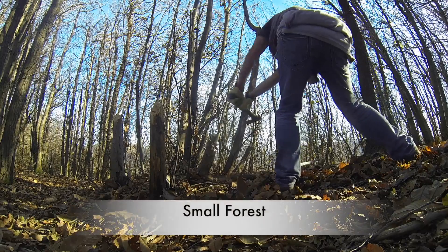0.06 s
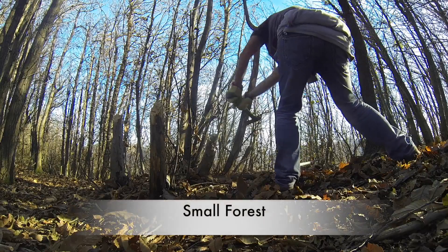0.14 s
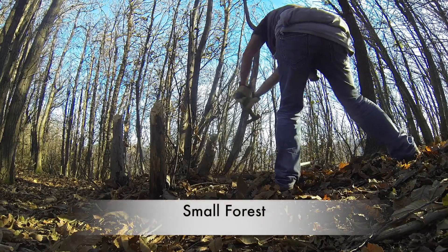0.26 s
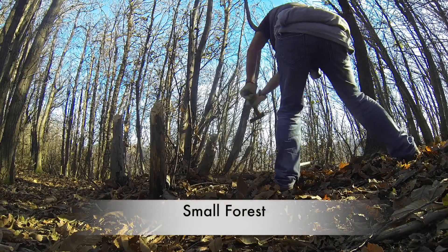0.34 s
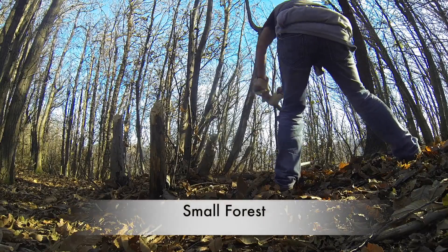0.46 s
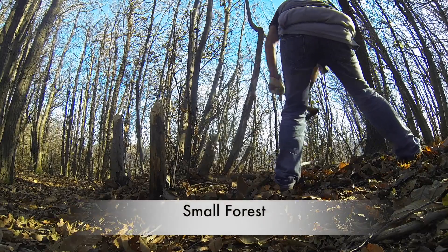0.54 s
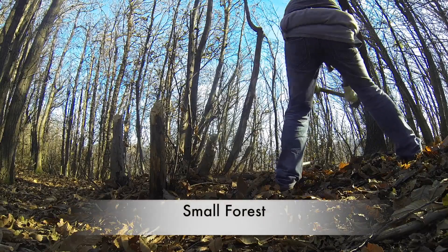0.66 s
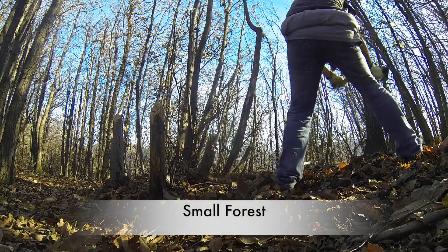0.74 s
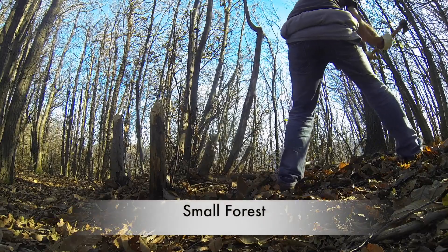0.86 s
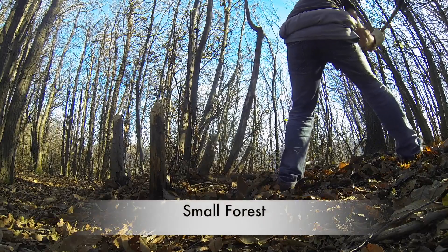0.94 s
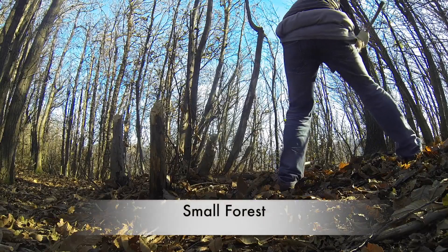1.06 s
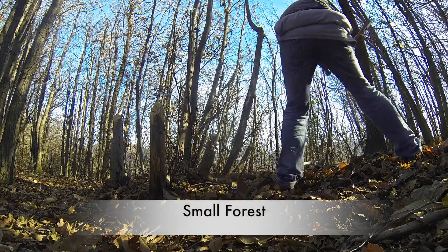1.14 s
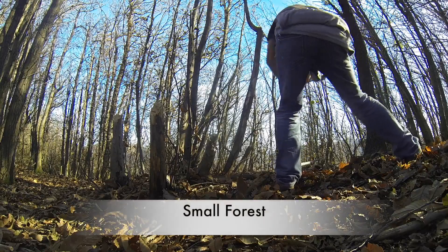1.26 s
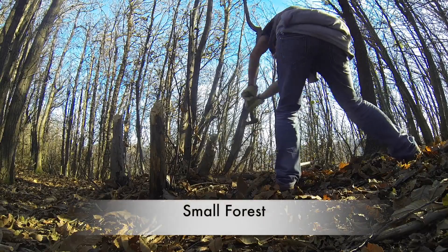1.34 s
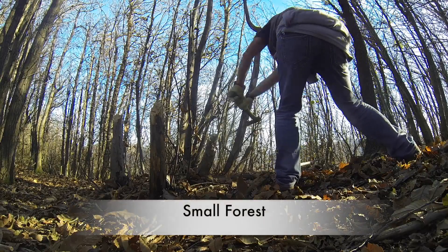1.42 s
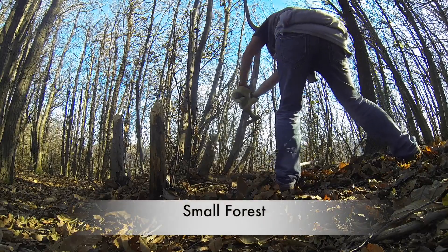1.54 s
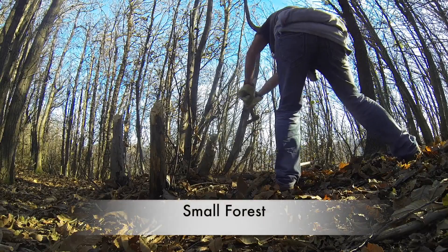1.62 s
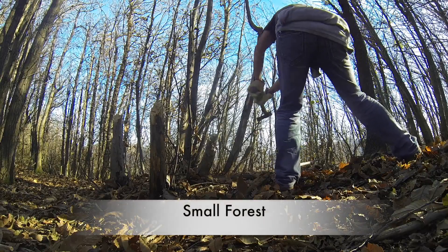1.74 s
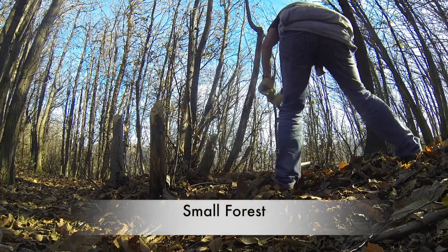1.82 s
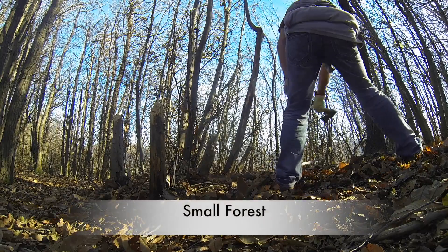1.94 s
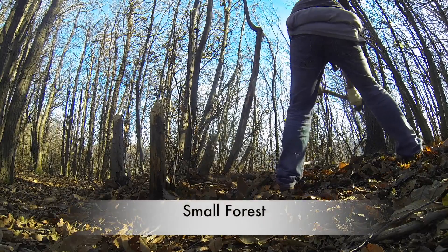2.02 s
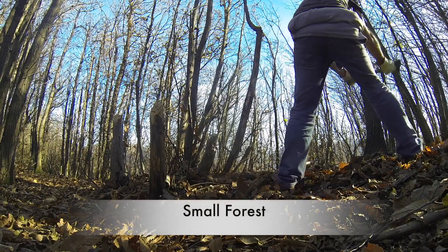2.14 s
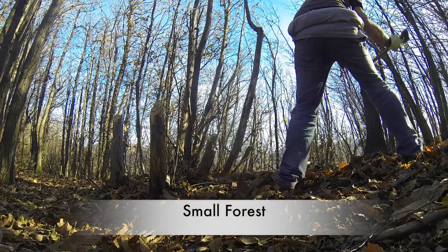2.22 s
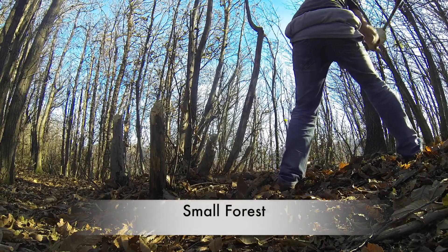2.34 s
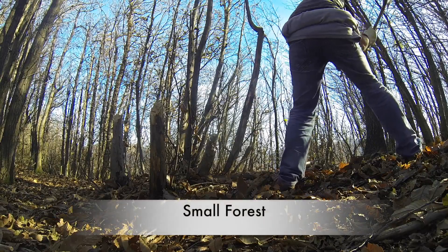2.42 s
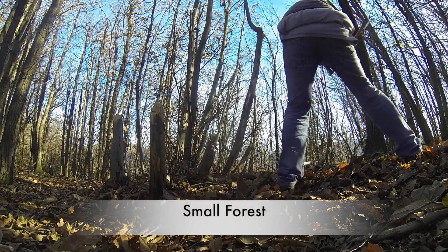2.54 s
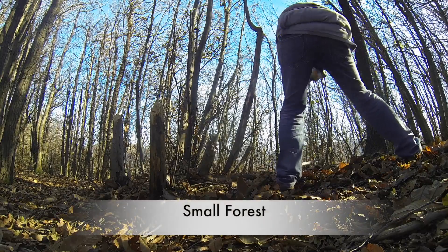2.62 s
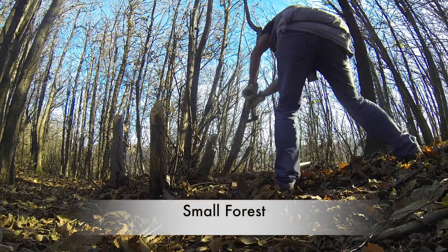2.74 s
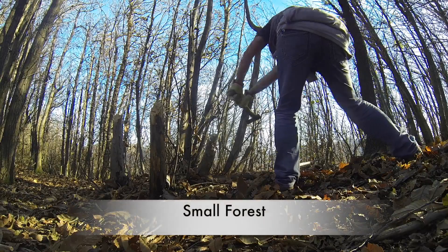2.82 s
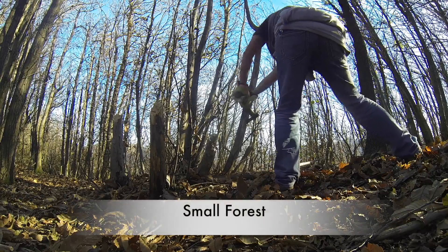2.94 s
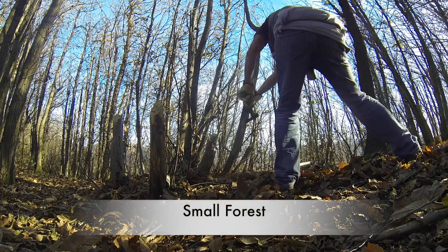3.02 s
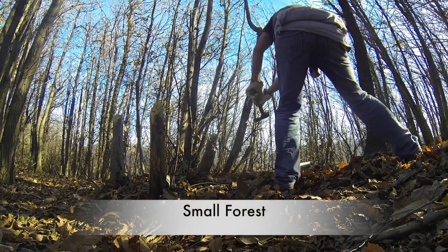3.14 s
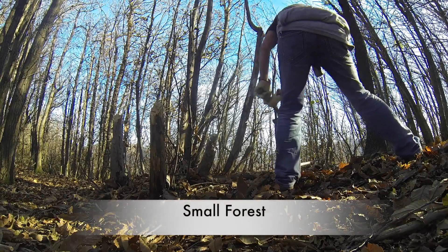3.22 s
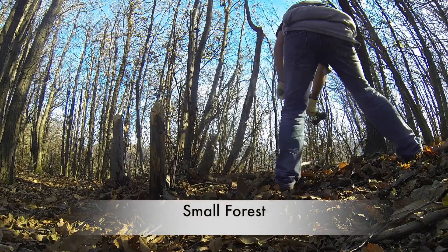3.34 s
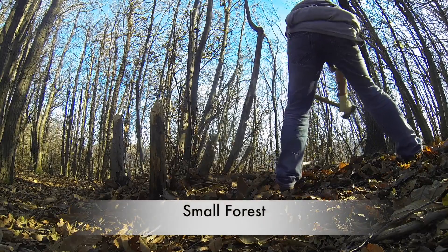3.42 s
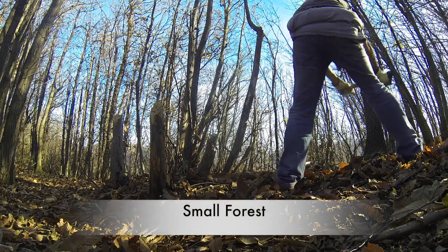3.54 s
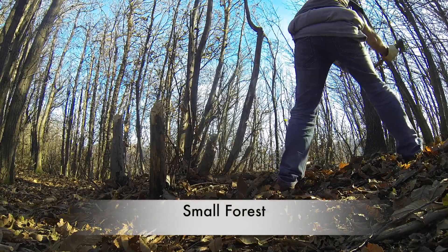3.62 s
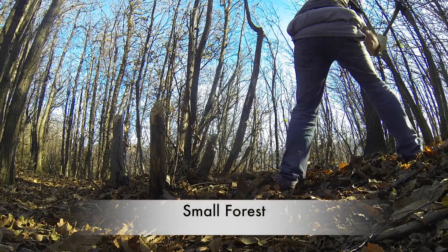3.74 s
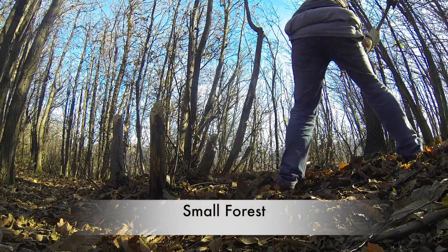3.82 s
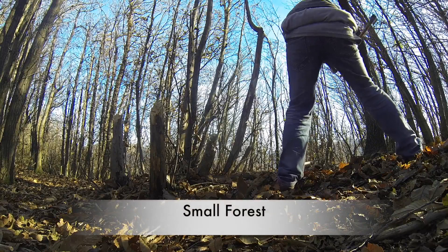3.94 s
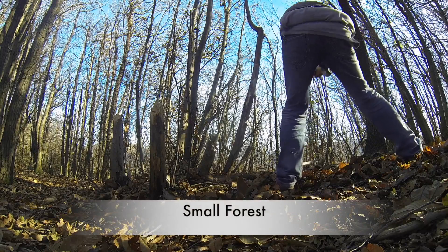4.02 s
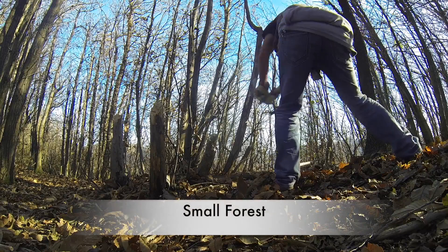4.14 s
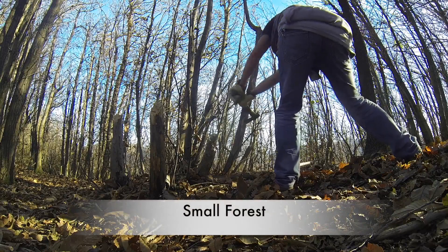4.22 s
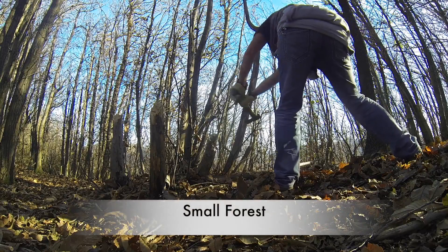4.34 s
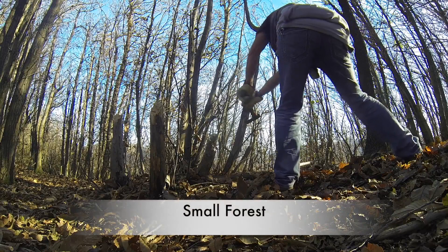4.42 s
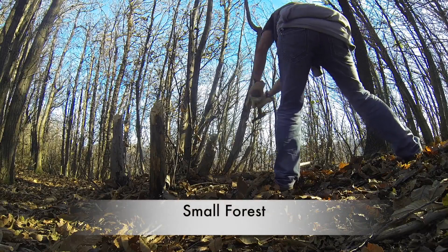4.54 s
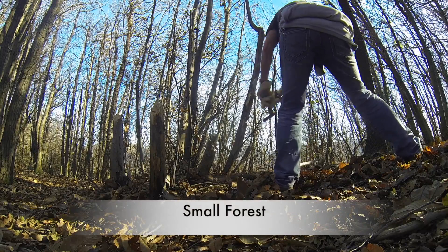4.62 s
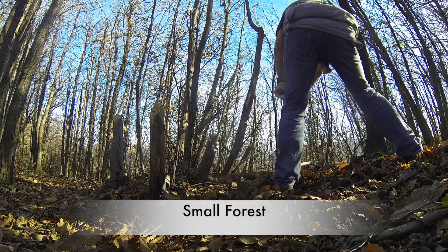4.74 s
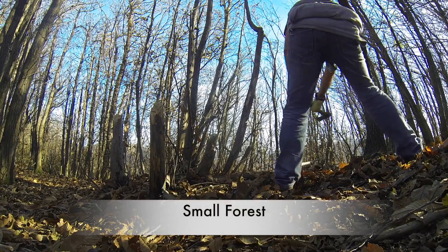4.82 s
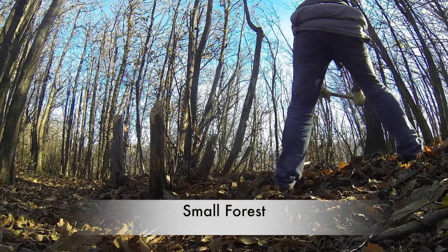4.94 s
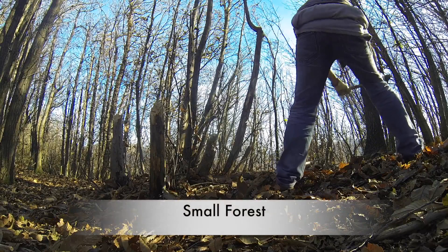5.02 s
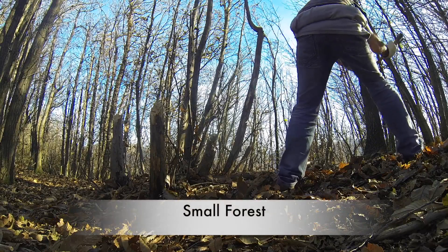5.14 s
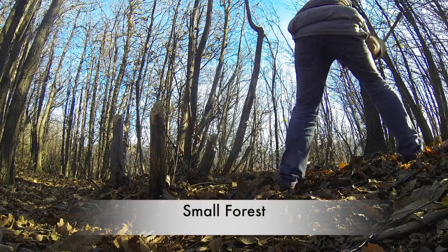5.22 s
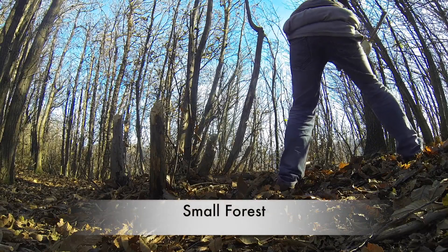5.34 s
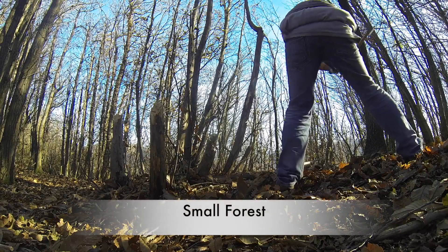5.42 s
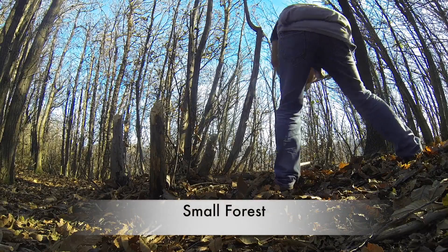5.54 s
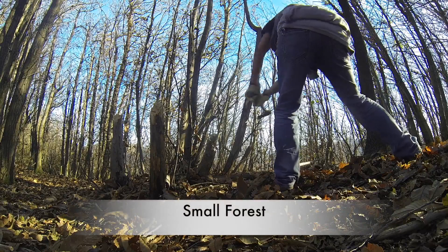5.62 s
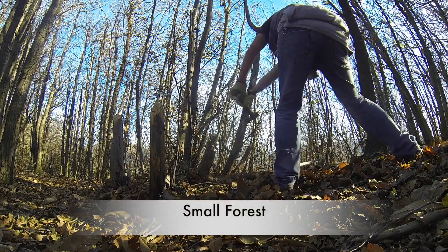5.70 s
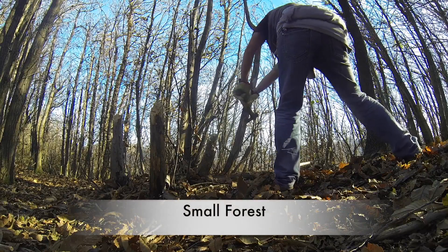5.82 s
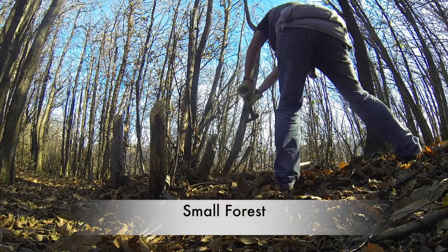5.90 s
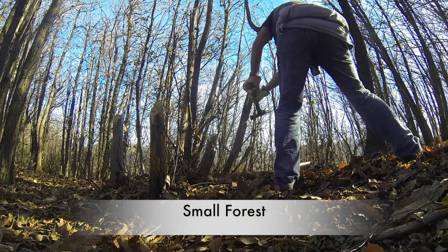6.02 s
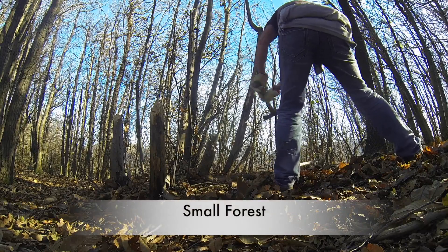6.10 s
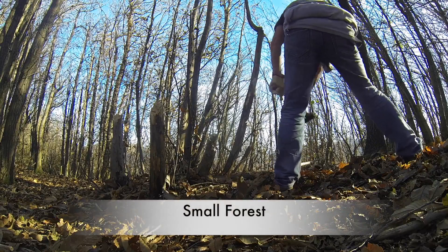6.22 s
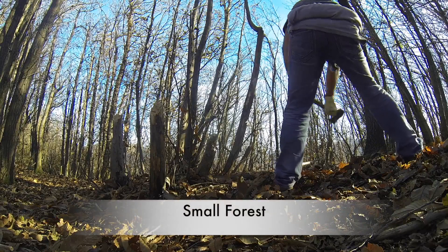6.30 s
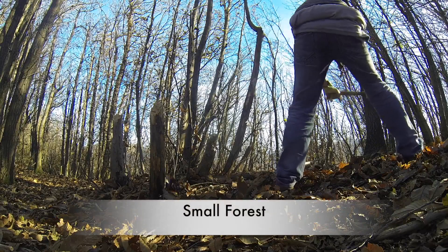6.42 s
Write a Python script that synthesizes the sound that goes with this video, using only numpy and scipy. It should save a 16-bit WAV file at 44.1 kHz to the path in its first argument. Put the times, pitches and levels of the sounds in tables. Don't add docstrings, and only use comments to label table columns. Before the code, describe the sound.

Five evenly spaced, close axe chops crack and thud in still woodland, with chips pattering into dry leaves and a faint distant bird.

```python
import sys
import numpy as np
from scipy import signal
from scipy.fft import rfft, irfft, next_fast_len
from scipy.io import wavfile
from scipy.ndimage import uniform_filter1d

SR = 44100
rng = np.random.default_rng(int(sys.argv[2]) if len(sys.argv) > 2 else 0)


def transcribe(u):
    v = np.clip(np.atleast_2d(u).T, -1, 1)
    q = np.round(v * 32767).astype(np.int16)
    wavfile.write(sys.argv[1], SR, q)


def voltage_ratio(level):
    return 10 ** (np.asarray(level, float) / 20)


N = 285327


def unit(x):
    return x / np.sqrt(np.mean(x ** 2) + 1e-20)


def peaked(x):
    return x / np.abs(x).max()


def wandering(count, size):
    return unit(uniform_filter1d(rng.standard_normal(count), size=size))


def along(points, hz):
    f, v = np.transpose(points)
    return np.interp(np.log(hz + 1), np.log(f + 1), v)


def curves(rows):
    s, *cols = np.transpose(rows)
    return [np.interp(np.arange(N) / SR, s, c) for c in cols]


def filtered(x, response):
    m = next_fast_len(len(x) + 8192)
    spectrum = rfft(x, m) * response(np.fft.rfftfreq(m, 1 / SR))
    return irfft(spectrum, m)[:len(x)]


def coloured(x, spectrum):
    return unit(filtered(x, lambda hz: voltage_ratio(along(spectrum, hz))))


def causal(points, hz):
    ceps = irfft(np.log(voltage_ratio(along(points, hz))))
    half = len(ceps) // 2
    folded = np.r_[ceps[0], 2 * ceps[1:half], np.zeros(len(ceps) - half)]
    return np.exp(rfft(folded))[:len(hz)]


def resonances(peaks, f):
    total = 0
    for k, (centre, width, db) in enumerate(peaks):
        damping = 1j * f * width
        total = total + (-1) ** k * voltage_ratio(db) * damping / (centre * centre - f * f + damping)
    return total


def ring(modes, t, scatter_db):
    total = 0
    for hz, db, t60, way in modes:
        level = db + scatter_db * rng.standard_normal()
        total = total + way * voltage_ratio(level - 60 * t / t60) * np.sin(2 * np.pi * hz * t)
    return total


def gritty(count, depth_db):
    return rng.standard_normal(count) * voltage_ratio(depth_db * wandering(count, 150))


def add(track, s, x):
    part = track[round(s * SR):][:len(x)]
    part += x[:len(part)]


# frequency in Hz, level in dB.
AIR_SPECTRUM = [(15, -29.5), (25, 3), (81, 0.5), (151, -4.5), (214, -3.5), (429, -18.5), (1130, -25),
                (1400, -28), (2390, -30), (3980, -34.5), (7170, -34), (11600, -39), (12900, -46.5),
                (14000, -45), (15200, -47.5)]
# time in seconds, level in dB.
TRAFFIC_LEVEL = [(0.0, -51), (2.88, -52), (3.12, -50), (3.55, -50), (4.27, -52.5), (4.49, -48),
                 (5.03, -51.5), (5.78, -51.5), (5.93, -49), (6.47, -53)]


def background():
    whine_hz, whine_db = 14060, -79.5
    drift = 0.6 * wandering(N, 400)
    whine = voltage_ratio(2.5 * wandering(N, 1500)) * np.sin(2 * np.pi * whine_hz * np.arange(N) / SR + drift)
    traffic_db = curves(TRAFFIC_LEVEL)[0] + 2.0
    return voltage_ratio(traffic_db) * coloured(rng.standard_normal(N), AIR_SPECTRUM) + voltage_ratio(whine_db) * whine


# time in seconds, pitch in Hz, level in dB.
BIRD_NOTES = [
    [(5.16, 732, -75), (5.17, 717, -64), (5.2, 705, -68), (5.276, 690, -68.5), (5.32, 705.3, -75.5)],
    [(5.425, 632, -64), (5.444, 640, -61), (5.528, 638, -57), (5.59, 640, -74)],
]


def bird():
    out = np.zeros(N)
    for note in BIRD_NOTES:
        hz, db = curves(note)
        db = db + 2 * wandering(N, 700)
        start, end = note[0][0], note[-1][0]
        edge = curves([(start - 0.02, 0), (start + 0.014, 1), (end - 0.02, 1), (end + 0.029, 0)])[0]
        phase = 2 * np.pi * np.cumsum(hz) / SR
        out += edge * voltage_ratio(db + 3.5) * (np.sin(phase) + voltage_ratio(-14.0) * np.sin(2 * phase))
    return out


def crackle(spectrum, clump_db, grit_db, grains, patchy_db):
    unevenness = voltage_ratio(clump_db * wandering(N, 900) + grit_db * wandering(N, 60))
    spikes = grains * (rng.random(N) < 600 / SR) * rng.standard_normal(N)
    z = signal.stft(unevenness * (rng.standard_normal(N) + spikes), nperseg=256)[2]
    patches = uniform_filter1d(rng.standard_normal(z.shape), size=8, axis=0)
    patches = uniform_filter1d(patches, size=5, axis=1)
    return coloured(signal.istft(z * voltage_ratio(patchy_db * unit(patches)), nperseg=256)[1][:N], spectrum)


def stroke(start, start_db, end, end_db):
    edge_s, fade_s = 0.022, 0.055
    t = np.arange(N) / SR
    edges = np.clip(np.minimum((t - start) / edge_s, (end - t) / fade_s + 0.5), 0, 1)
    return edges * voltage_ratio(np.interp(t, [start, end], [start_db, end_db]))


# frequency in Hz, level in dB per Hz.
CRISP_SPECTRUM = [(1470, -39.5), (2500, -7), (3860, -6), (5200, -6), (6860, 0), (8460, -1.5), (10500, -8),
                  (12500, -20.5), (15600, -38.5), (16000, -46)]
# frequency in Hz, level in dB.
CLOTH_SPECTRUM = [(260, -23.5), (450, 0), (627, -14), (760, -1.5), (1460, -3.5), (2930, -5.5),
                  (5000, -24.5), (6500, -34), (11000, -120)]
# tug in seconds, catch overhead in seconds.
LIFTS_AT = [
    (.36, 1.115),
    (1.832, 2.53),
    (3.205, 3.91),
    (4.625, 5.43),
    (6.04, 6.6),
]
# level at the tug in dB, level at the catch in dB.
LIFT_LEVELS = [(-63, -61), (-54.5, -71), (-53, -69), (-63, -67.5), (-68, -59)]
# start in seconds, level in dB, crumbs settling after the blow in dB.
DOWNSWINGS = [
    (0, -68, -61),
    (1.28, -68, -62),
    (2.72, -67, -48.5),
    (4.09, -69, -64.5),
    (5.64, -65.5, -55),
]
# start in seconds, swell in seconds, crisp in dB, cloth in dB.
SCUFFS_AT = [(.62, 0.022, -55.5, -54), (0.661, 0.01, -45.5, -56), (0.729, 0.018, -61, -61),
             (.768, 0.011, -56.5, -72), (1.062, 0.0061, -57.5, -61), (1.725, 0.01005, -66, -55),
             (1.856, 0.011, -75.5, -58), (2.004, 0.022, -56, -65), (2.101, 0.0041, -49.5, -62),
             (2.486, 0.0092, -61, -51.5), (3.081, 0.0074, -48, -45.5), (3.215, 0.0056, -61, -51),
             (3.28, 0.0048, -75, -57), (3.345, 0.013, -52, -70), (3.873, 0.008, -62, -51.5),
             (4.673, 0.0044, -56.5, -48), (4.784, 0.0041, -50.5, -60), (5.379, 0.0093, -59, -56.5),
             (6.202, 0.0094, -62, -58.5), (6.377, 0.012, -52, -56)]


def leaves():
    t = np.arange(N) / SR
    motion = voltage_ratio(-72) + np.zeros(N)
    for (tug, catch), (tug_db, catch_db) in zip(LIFTS_AT, LIFT_LEVELS):
        motion += stroke(tug, tug_db, catch, catch_db)
    for (s, db, settle_db), (blow, *_) in zip(DOWNSWINGS, BLOWS_AT):
        motion += stroke(s, db, blow, db + 2.5)
        motion += stroke(blow, settle_db, blow + 0.22, settle_db - 16)
    crisp_gain, cloth_gain = motion, voltage_ratio(-4) * motion
    for s, swell, crisp_db, cloth_db in SCUFFS_AT:
        u = np.maximum(t - s, 0) / swell
        bump = u * np.exp(1 - u)
        crisp_gain = crisp_gain + voltage_ratio(crisp_db) * bump
        cloth_gain = cloth_gain + voltage_ratio(cloth_db) * bump
    crisp = crackle(CRISP_SPECTRUM, clump_db=1.5, grit_db=2.0, grains=4, patchy_db=2.5)
    cloth = crackle(CLOTH_SPECTRUM, clump_db=3.5, grit_db=2.5, grains=5.7, patchy_db=2.0)
    return crisp_gain * crisp + cloth_gain * cloth


def snap(out, s, db, hz, knock_db, leaf_db, t60):
    t = np.arange(SR // 16) / SR
    decay = voltage_ratio(-60 * t / max(t60, 0.004)) * np.minimum(t / 0.0003, 1)
    burst = np.sign(rng.standard_normal(len(t))) * decay
    tick = filtered(burst, lambda f: resonances([(hz, 0.12 * hz + 500, 0)], f) ** 2.0)
    leaf = filtered(burst, lambda f: causal(CRISP_SPECTRUM, f))
    litter = [(240, 300, -2.5), (764, 520, -17.5)]
    knock = filtered(burst, lambda f: resonances(litter, f) / (1 + 1j * f / 1500))
    mixed = peaked(tick) + voltage_ratio(leaf_db) * peaked(leaf) + voltage_ratio(knock_db) * peaked(knock)
    add(out, s, voltage_ratio(db - 3.0) * mixed)


def ping(out, s, db, hz, t60):
    t = np.arange(SR // 16) / SR
    add(out, s, voltage_ratio(db - 60 * t / t60) * np.minimum(t / 0.0012, 1) * np.sin(2 * np.pi * hz * t))


# start in seconds, peak in dB, colour in Hz.
LEAF_TICKS_AT = [(0.423, -40, 7730), (0.6354, -38.5, 8650), (0.7697, -32, 4540), (0.555, -43, 6470),
                 (.945, -43, 7900), (0.8672, -44, 6190), (0.984, -43, 9200), (1.2712, -44, 8000),
                 (1.74, -47, 8500), (1.953, -41.5, 8120), (1.9943, -46, 6280), (2.1014, -38, 6870),
                 (2.7174, -48, 6520), (3.2161, -28.5, 8230), (3.3286, -40, 7800), (3.3288, -46, 4300),
                 (3.5156, -38, 6380), (4.09, -55.5, 7020), (4.6362, -44, 7940), (4.6743, -30.5, 6400),
                 (4.674, -36.5, 4000), (0.7704, -36.5, 8000), (4.322, -50.5, 7000), (4.7862, -47, 4590),
                 (5.013, -44, 8270), (5.164, -45, 8730), (5.339, -43.5, 9000), (5.675, -44, 7750),
                 (6.055, -42.5, 7130), (6.0752, -43, 8330), (6.206, -41.5, 6140), (6.115, -44.5, 7130),
                 (6.363, -47, 7330), (6.384, -37, 7100), (0.4986, -48, 7000), (0.807, -45, 9060),
                 (1.027, -46, 9000), (1.052, -44.5, 8000), (1.08, -40, 9500), (1.7212, -51, 7000),
                 (1.75, -43, 9500), (1.835, -47, 8000), (1.9458, -48.5, 9000), (2.0233, -45, 8000),
                 (2.285, -48, 4950), (3.289, -47, 6200), (3.5668, -47, 5000), (4.5137, -41.5, 8060),
                 (4.6969, -48, 8000), (4.718, -41.5, 7000), (5.285, -47, 6460)]
# knock in dB, leaf edge in dB, t60 in seconds.
LEAF_BODY = (-13, 2.3, 0.013)
# start in seconds, peak in dB, colour in Hz.
TWIGS_AT = [(.4436, -37.5, 2620), (.445, -45, 1490), (.5525, -50, 3290), (1.7406, -46, 1210),
            (2.104, -37.5, 2670), (2.1949, -47, 1710), (2.233, -44, 2540), (2.2835, -48, 3030),
            (2.3223, -43.5, 2980), (3.6087, -44, 2590), (3.645, -43, 3560), (4.321, -41.5, 1100),
            (4.318, -46.5, 2900), (2.215, -49, 2300), (2.217, -48, 1300), (2.231, -47, 1200),
            (2.499, -39, 1000), (2.516, -42.5, 1000), (4.749, -48, 3500), (4.718, -40, 2830),
            (5.2831, -44.5, 2760)]
# knock in dB, leaf edge in dB, t60 in seconds.
TWIG_BODY = (-15, -4.5, 0.013)
# start in seconds, level in dB, pitch in Hz, t60 in seconds.
BUMPS_AT = [
    (1.864, -47.5, 333, .03),
    (1.881, -45, 330, .03),
    (2.131, -39.5, 300, 0.024),
    (2.229, -43, 402, .025),
    (2.4922, -37.5, 283, 0.047),
    (1.0718, -39, 328, 0.038),
    (4.3582, -12, 500, 0.013),
]


def litter():
    out = np.zeros(N)
    for row in LEAF_TICKS_AT:
        snap(out, *row, *LEAF_BODY)
    for row in TWIGS_AT:
        snap(out, *row, *TWIG_BODY)
    for row in BUMPS_AT:
        ping(out, *row)
    return out


# start in seconds, peak in dB, colour in Hz, knock in dB.
GRIPS_AT = [
    (0.6687, -44.5, 1990, 10.5),
    (1.0656, -39.5, 2600, -8),
    (1.073, -40.5, 1680, -12.5),
    (1.0784, -34, 880, -10.5),
    (2.0234, -41, 2100, 1),
    (2.4889, -42, 1210, 1),
    (3.3473, -57.5, 600, 23),
    (3.873, -33.5, 2750, -3),
    (5.3799, -39.5, 1700, -5),
    (6.3803, -36, 2980, -3.5),
]
# leaf edge in dB, t60 in seconds.
GRIP_BODY = (-11, 0.028)


def hands():
    out = np.zeros(N)
    for row in GRIPS_AT:
        snap(out, *row, *GRIP_BODY)
    return out


# time in seconds, pitch in Hz, level in dB.
SQUEAK_PATH = [
    (4.688, 2800, -65),
    (4.705, 2720, -58),
    (4.722, 2950, -54.5),
    (4.745, 2800, -65),
]


def squeak():
    hz, db = curves(SQUEAK_PATH)
    t = np.arange(N) / SR
    waver = unit(uniform_filter1d(rng.standard_normal((2, N)), size=130, axis=1))
    on = (t > SQUEAK_PATH[0][0]) & (t < SQUEAK_PATH[-1][0])
    return on * voltage_ratio(db + 5.5 * waver[0]) * np.sin(2 * np.pi * np.cumsum(hz + 170 * waver[1]) / SR)


# start in seconds, peak in dB, colour in Hz, knock in dB, leaf edge in dB.
CHIPS_AT = [(0.2087, -25, 1040, -21.5, -11), (0.212, -28, 6980, -28.5, 6), (0.325, -40.5, 8300, 3, 11.5),
            (1.5322, -21.5, 6670, -12, -3.5), (1.6236, -33, 1090, -31, -1), (2.9334, -19, 3600, -13, -10.5),
            (2.938, -26, 7900, -21.5, 0), (2.979, -20, 2020, -10, -2.5), (3.027, -32, 3050, 0, 8.5),
            (3.0825, -36.5, 1310, 3, 6), (4.3805, -17, 2030, 3, -17), (4.4038, -27.5, 2100, -4, 2.5),
            (4.451, -25.5, 1960, -7.5, -13.5), (4.452, -27, 7800, -9.5, 1), (4.481, -44, 1590, 14, -10),
            (4.496, -46, 1170, 19, -8), (4.514, -41.5, 1470, -5.5, -4), (5.8274, -11, 930, -28, -19),
            (5.854, -27, 2500, -2.5, 6.5), (5.8563, -21, 3560, 0, 9), (5.866, -21, 1290, -2.5, -3)]
# start in seconds, level in dB, pitch in Hz, t60 in seconds.
PINGS_AT = [(2.981, -27.5, 6900, 0.022), (4.383, -34, 6100, 0.023), (4.452, -25, 6560, 0.02),
            (2.953, -35.5, 2950, .03), (3.329, -46, 2300, .012), (5.381, -45, 1100, .03),
            (5.404, -51, 950, .03), (5.827, -30, 4300, .012), (.7702, -42, 4670, .015),
            (1.0655, -44, 2640, 0.013), (1.0665, -40.5, 900, 0.024), (1.08, -43, 879.6, .015),
            (4.6745, -36.5, 1939, .015)]


def chips():
    out = np.zeros(N)
    for row in CHIPS_AT:
        snap(out, *row, 0.019)
    for row in PINGS_AT:
        ping(out, *row)
    return out


# start in seconds, length in seconds, level in dB, pitch in Hz.
SWAYS_AT = [
    (.375, .105, -36.5, 88),
    (1.709, .07, -45.5, 90.2),
    (3.115, .07, -41.5, 91.8),
    (4.545, .075, -37, 90),
    (6.03, 0.101, -36, 87.9),
]


def sway():
    out = np.zeros(N)
    for s, length, db, hz in SWAYS_AT:
        t = np.arange(round(length * SR)) / SR
        swell = np.sin(np.pi * (t / length) ** 0.7) ** 0.8
        add(out, s, voltage_ratio(db) * swell * np.sin(2 * np.pi * hz * t))
    return out


# frequency in Hz, level in dB per Hz.
SCATTER_SPECTRUM = [(260, -31.5), (450, -0.5), (635, -8), (1170, -5), (2160, -17), (2870, -14.5),
                    (5220, -20.5), (7360, -13.5), (10500, -28.5), (14200, -50), (16000, -72)]
# frequency in Hz, t60 in seconds.
WOOD_DECAY = [(200, 0.44), (600, 0.15), (2000, 0.52), (8000, 0.45), (14000, .2)]


def echo(count):
    scattered = coloured(gritty(count, depth_db=2.0), SCATTER_SPECTRUM)
    hz, t, z = signal.stft(scattered, SR, nperseg=256)
    decay = voltage_ratio(-60 * t / along(WOOD_DECAY, hz)[:, None])
    return signal.istft(z * decay, SR, nperseg=256)[1][:count]


# near trunks in dB, far trunks in dB.
TRUNK_LEVELS = [(-18.5, -31), (-18.5, -31.5), (-17, -29), (-16.5, -31.5), (-18, -29.5)]
# frequency in Hz, level in dB per Hz.
SOIL_SPECTRUM = [(40, -31), (70, 0), (150, 5), (300, 0), (500, -11), (900, -35.5)]


def surroundings(t, near_db, far_db, rebound_db):
    near = voltage_ratio(near_db - 60 * t / 0.1) * coloured(gritty(len(t), depth_db=3.5), SCATTER_SPECTRUM)
    rumble_db = -21 + 0.79 * rebound_db
    rumble = voltage_ratio(rumble_db - 60 * t / 0.39) * coloured(rng.standard_normal(len(t)), SOIL_SPECTRUM)
    return np.minimum(t / 0.013, 1) * (near + voltage_ratio(far_db) * echo(len(t)) + rumble)


# frequency in Hz, level in dB.
CRACK_SPECTRUM = [(300, -19.5), (800, -8), (2000, -5.5), (3500, -6), (5000, -12), (8000, -7.5),
                  (10500, -12), (13000, -31.5), (16000, -46)]


def crack(t, cut, split, splinter_db, splinter_hz):
    wood = np.zeros(len(t))
    for hz, db, t60, rise in cut:
        wander = 0.5 * wandering(len(t), 40)
        build_up = 1 - np.exp(-t / rise)
        wood += voltage_ratio(db - 60 * t / t60) * build_up * np.sin(2 * np.pi * hz * t + 0.69 * wander)
    wood = wood * np.minimum(t / 0.0011, 1)
    peak, spread, after_db = split
    parting = np.exp(-((t - peak) / spread) ** 2)
    after_crackle = voltage_ratio(after_db - 60 * t / 0.065) * np.minimum(t / peak, 1)
    force = (parting + after_crackle) * np.minimum(t / 0.00049, 1)
    tearing = np.sign(rng.standard_normal(len(t))) * force
    splinter = [(splinter_hz, 1200, 4)]
    fibres = filtered(tearing, lambda hz: causal(CRACK_SPECTRUM, hz) * (1 + resonances(splinter, hz)))
    return peaked(peaked(wood) + voltage_ratio(splinter_db) * peaked(fibres))


# pitch in Hz, level in dB, t60 in seconds, direction.
GROUND_MODES = [(64.9, -19.2, 0.342, 1), (78.5, -29.4, 0.731, -1), (96.6, -24.7, 0.63, -1),
                (108.0, -13.1, 0.115, 1), (147.4, -2.0, 0.04, -1), (156.6, -17.1, 0.246, 1),
                (205.4, -28.7, 0.31, -1), (236.4, -2.0, 0.04, -1), (241.7, -8.2, 0.101, 1),
                (312.0, -28.8, 0.186, 1), (340.0, -12.2, 0.099, 1), (344.4, -14.4, 0.101, -1),
                (441.9, -33.2, 0.077, -1)]
# pitch in Hz, level in dB, t60 in seconds, direction.
STEM_MODES = [(84.6, 1.5, .9, 0.9), (91.3, -3.5, 0.93, 0.7), (101.24, -8, .9, -0.79)]


def thud(t, thud_db, upper_db, stem_db, held):
    ground = [(hz, db + upper_db * (hz > 200), t60, way) for hz, db, t60, way in GROUND_MODES]
    shaken = voltage_ratio(thud_db) * (1 - np.exp(-t / 0.001)) * ring(ground, t, scatter_db=-1.37)
    stilled = np.clip((held - t) / 0.041, 0, 1) * np.minimum(t / 0.084, 1)
    return shaken + voltage_ratio(stem_db) * ring(STEM_MODES, t, scatter_db=0.5) * stilled


# pitch in Hz, level in dB, t60 in seconds, direction.
REBOUND_MODES = [(135, -14.5, 0.04, -0.76), (264, -20.5, 0.023, -0.71), (436, -28.5, .03, 0.42)]


def rebound(t, db):
    return voltage_ratio(db) * (1 - np.exp(-t / 0.001)) * ring(REBOUND_MODES, t, scatter_db=3.0)


# start in seconds, crack in dB, splinter in dB, splinter in Hz.
BLOWS_AT = [
    (0.1888, 2.5, -1, 7950),
    (1.5176, 0.5, 1, 7190),
    (2.9197, 4, -5, 7850),
    (4.3436, 0.5, -4.5, 7970),
    (5.8127, 1, -2.5, 6690),
]
# pitch in Hz, level in dB, t60 in seconds, build-up in seconds.
FIRST_CUT = [(1900, 6, 0.011, .0004), (1194.4, -0.5, 0.038, 0.0024), (3116, -7.5, 0.026, 0.0023),
             (583, -17.5, 0.044, 0.0032), (2260, -1, 0.014, 0.0006), (510, -11.5, 0.035, 0.0023),
             (856, -13, 0.039, .002)]
SECOND_CUT = [(1904, -10, 0.029, 0.00092), (871, -8.5, 0.024, 0.0012), (371.8, -9.5, 0.061, 0.0053),
              (2250, 1.5, 0.011, 0.00065), (3050, -2.5, 0.016, 0.00061), (3390, -12, 0.012, 0.0018),
              (600, -12, 0.042, 0.0051), (1100, -10, 0.028, 0.002), (1331, -13, 0.028, 0.0018),
              (2440, -5, 0.012, .001), (4225, -10.5, 0.013, .001)]
THIRD_CUT = [(1967, 5.5, 0.0071, 0.00034), (2930, 3.5, 0.011, 0.00081), (930, -10, 0.033, 0.0035),
             (502.7, -12.5, 0.023, 0.001), (1310, -11, 0.034, .002), (683, -19, 0.028, 0.002),
             (2967, -27, 0.093, 0.0046), (3650, -9.5, .012, 0.0011), (4260, -11, 0.016, 0.0011)]
FOURTH_CUT = [(2094, -2, 0.012, 0.00086), (1138, -4.5, 0.033, 0.002), (612, -3.5, 0.021, 0.0017),
              (2980, -15.5, 0.025, 0.0024), (774, -11, 0.025, .002), (406, -12.5, 0.065, 0.0025),
              (928, -11, 0.045, 0.0024), (1710, -8, 0.025, 0.0011)]
FIFTH_CUT = [(1182, 6, 0.021, 0.006), (1420, -7, 0.018, .003), (1990, -4.5, 0.022, 0.0021),
             (588.4, -12.5, 0.029, 0.0025), (2900, -5, 0.016, 0.0015), (2500, -11.5, 0.018, 0.0016),
             (4200, -10.5, 0.013, .001), (791, -14, 0.031, 0.0025), (472, -8, 0.03, 0.0028)]
# loudest after in seconds, spread in seconds, after-crackle in dB.
FIBRE_SPLITS = [(.0038, .0013, -15.5), (.0021, .0011, -8.5), (0.0018, 0.002, -10), (.0024, .0012, -13),
                (.0024, 0.0013, -10.5)]
THUDS_AT = [.1949, 1.5229, 2.9248, 4.3483, 5.8175]
REBOUNDS_AT = [0.2968, 1.6253, 3.0289, 4.4528, 5.908]
# thud in dB, upper ground modes in dB, rebound in dB, stem ring in dB,
# stem stilled after in seconds.
LANDINGS = [
    (-1, -0.5, -1.5, -34, 0.22),
    (-1, -5, -2, -43.5, 0.22),
    (-1, -8.5, -1, -40.5, .22),
    (1, 3, 0.5, -34, .22),
    (1, 0, -12.5, -30, .23),
]


def axe():
    out, t = np.zeros(N), np.arange(SR // 2) / SR
    cuts = [FIRST_CUT, SECOND_CUT, THIRD_CUT, FOURTH_CUT, FIFTH_CUT]
    rows = zip(BLOWS_AT, FIBRE_SPLITS, cuts, THUDS_AT, REBOUNDS_AT, TRUNK_LEVELS, LANDINGS)
    for blow, split, cut, thud_s, rebound_s, (near_db, far_db), landing in rows:
        s, db, splinter_db, splinter_hz = blow
        thud_db, upper_db, rebound_db, stem_db, held = landing
        add(out, s, voltage_ratio(db) * crack(t, cut, split, splinter_db, splinter_hz))
        add(out, s, surroundings(t, near_db, far_db, rebound_db))
        add(out, thud_s, thud(t, thud_db, upper_db, stem_db, held))
        add(out, rebound_s, rebound(t, thud_db + rebound_db))
    return out


# frequency in Hz, gain in dB.
PORT_GAIN = [(20, -26), (36, -1.5), (50, 3), (10500, 0), (12500, -12), (15000, -11), (16500, -38.5)]


def scene():
    close = axe() + sway() + chips() + squeak() + hands() + litter()
    near = filtered(close, lambda hz: voltage_ratio(along(PORT_GAIN, hz)))
    faint = filtered(leaves() + bird() + background(), lambda hz: hz < 15300)
    return (near + faint)[None]


def band_limit(x):
    return signal.sosfilt(signal.butter(12, 16510, fs=SR, output="sos"), x)


# frequency in Hz, gain in dB.
TOP_GAIN = [(14500, -1.5), (16300, -11), (16700, -60)]


def record(dry):
    clipped = dry[0] / (1 + np.abs(dry[0] / 1.08) ** 12) ** (1 / 12)
    mix = filtered(clipped, lambda hz: voltage_ratio(along(TOP_GAIN, hz)))[None]
    return band_limit(mix)


dry = scene()
out = record(dry)
transcribe(out)
```